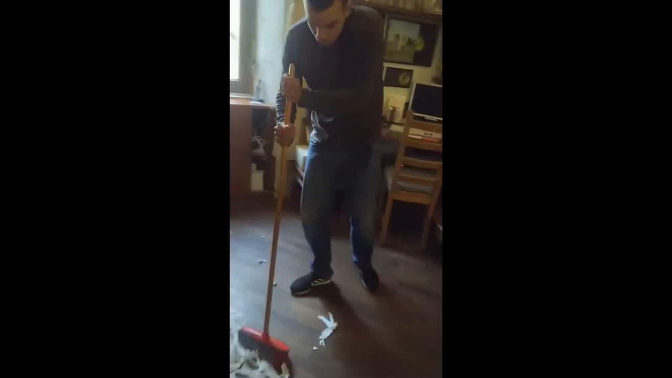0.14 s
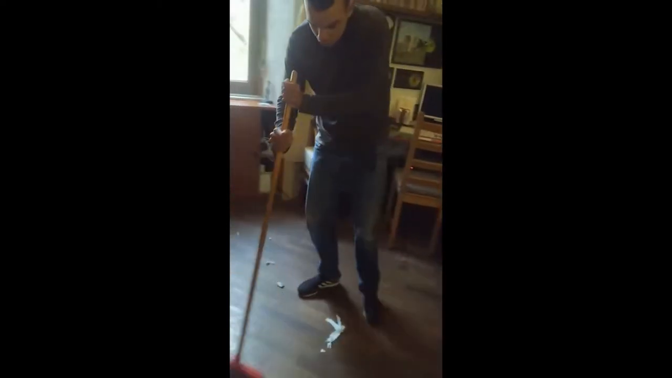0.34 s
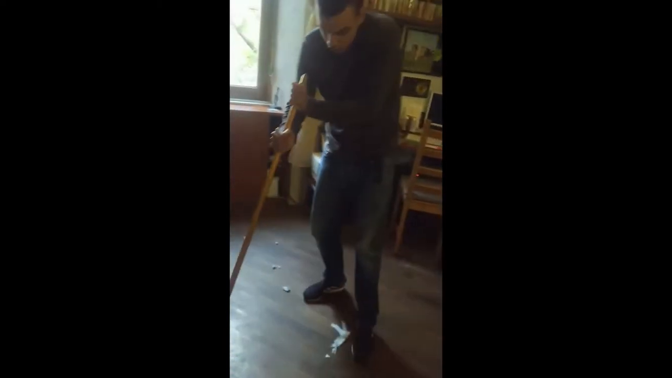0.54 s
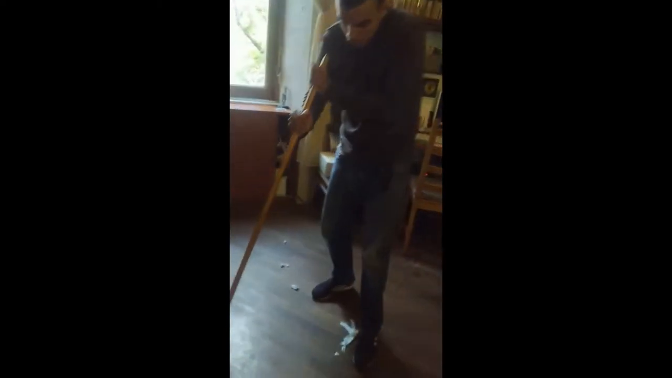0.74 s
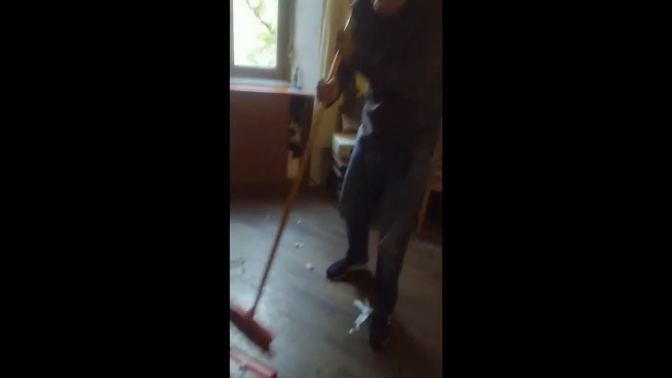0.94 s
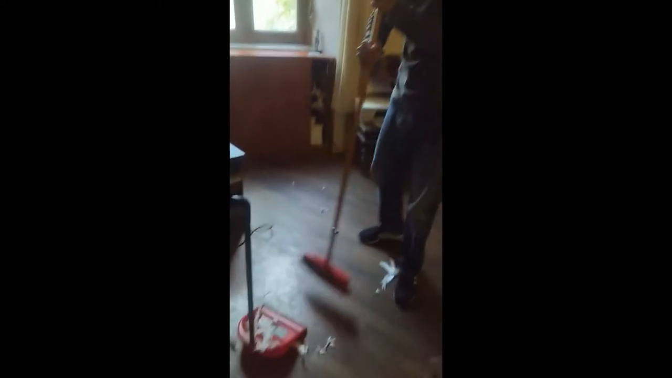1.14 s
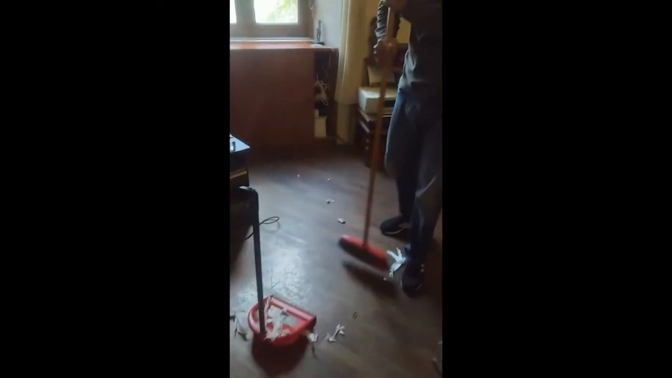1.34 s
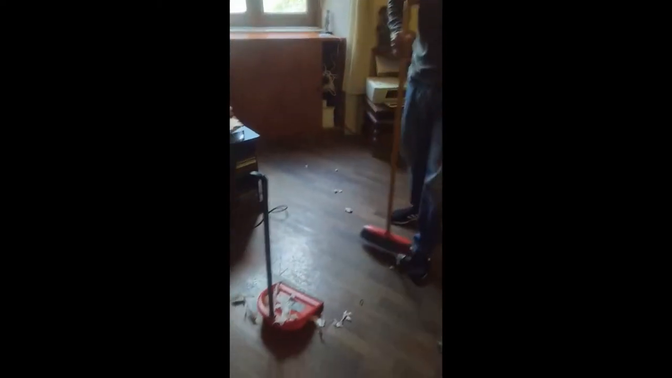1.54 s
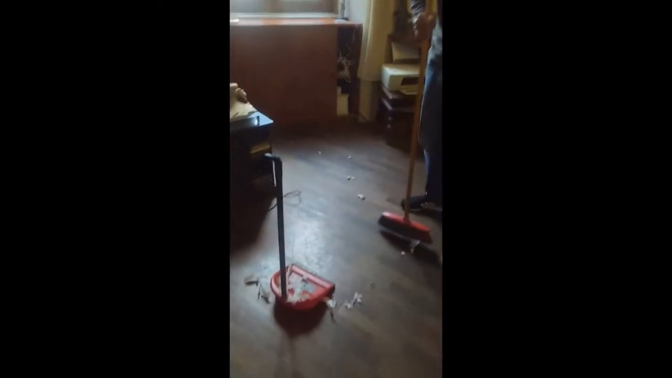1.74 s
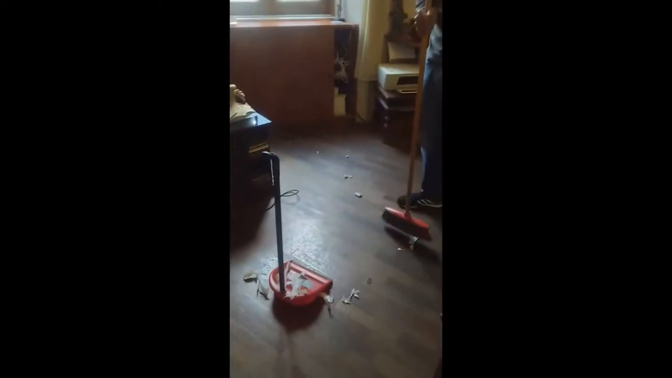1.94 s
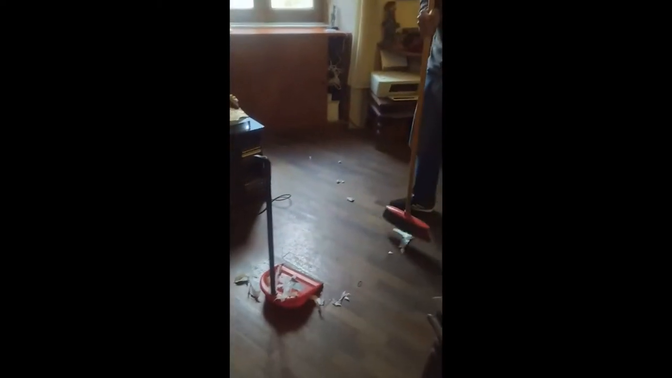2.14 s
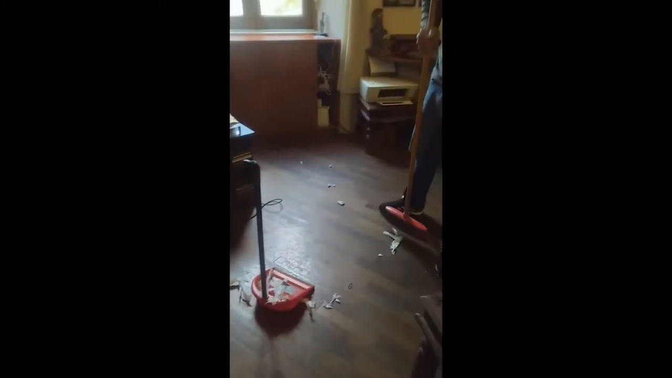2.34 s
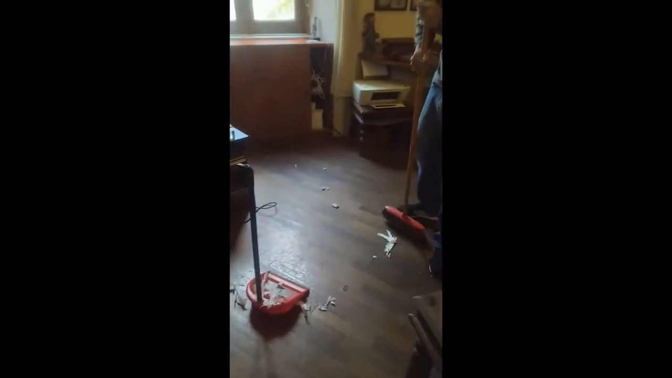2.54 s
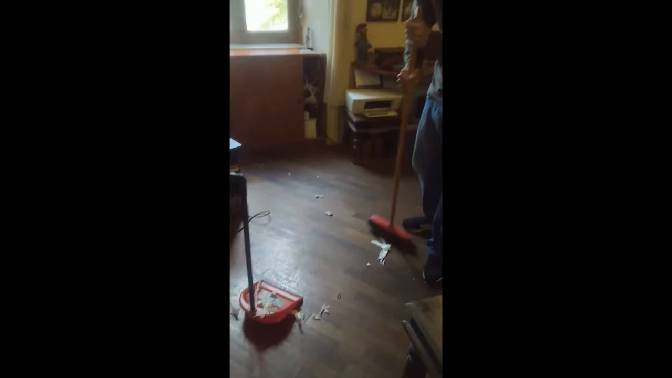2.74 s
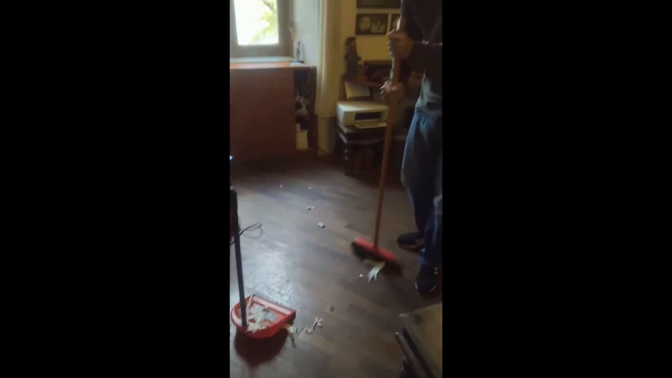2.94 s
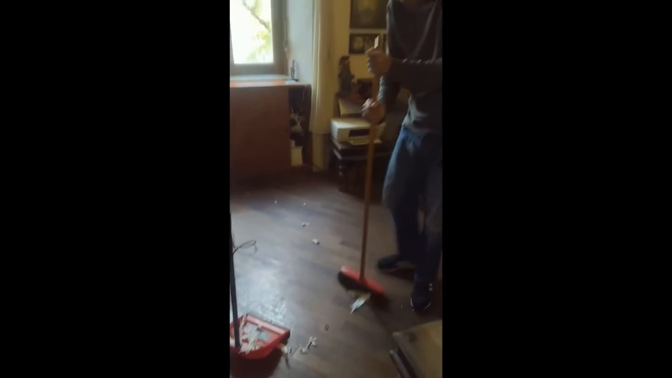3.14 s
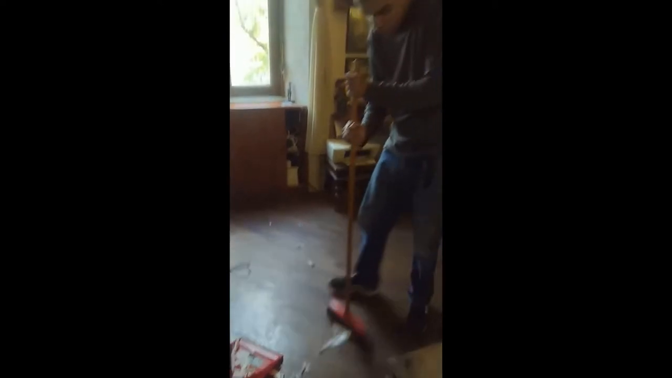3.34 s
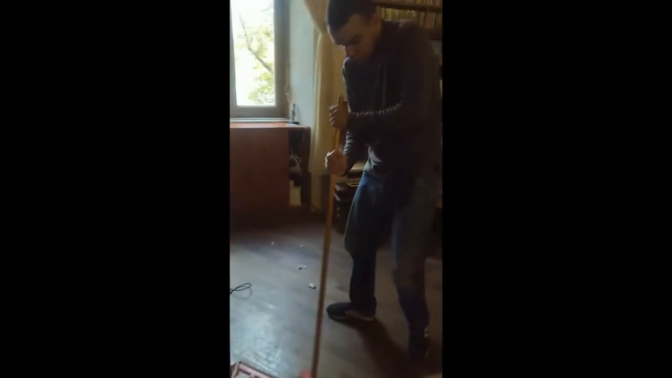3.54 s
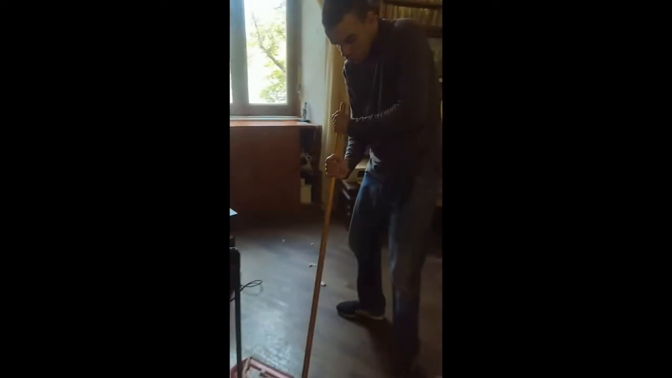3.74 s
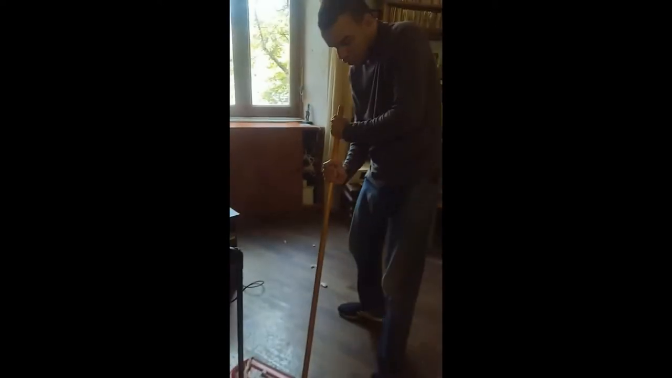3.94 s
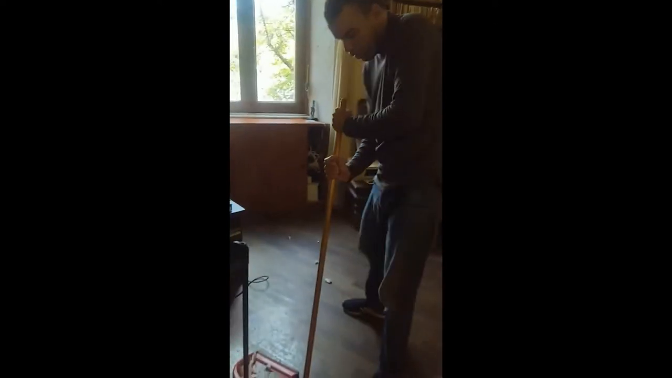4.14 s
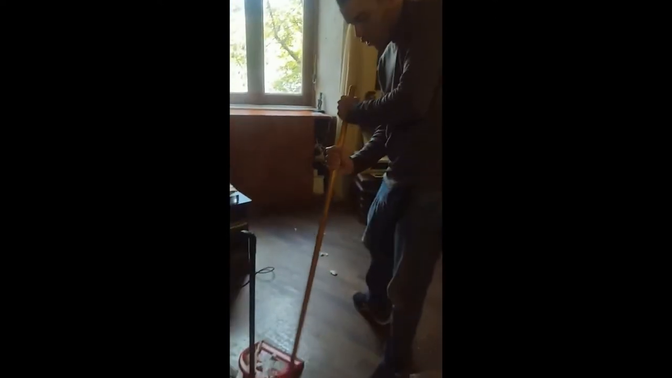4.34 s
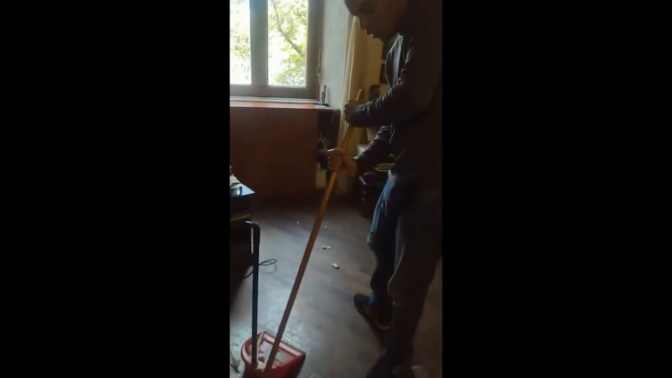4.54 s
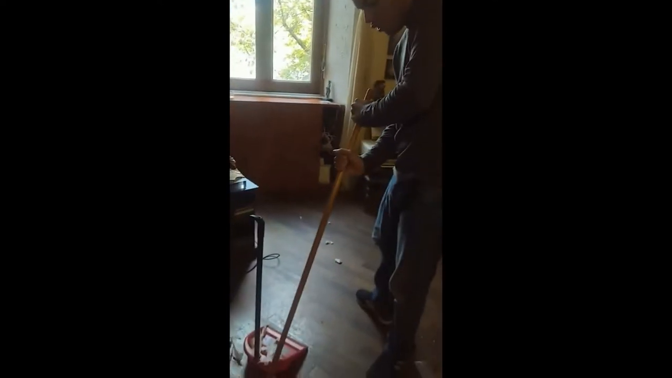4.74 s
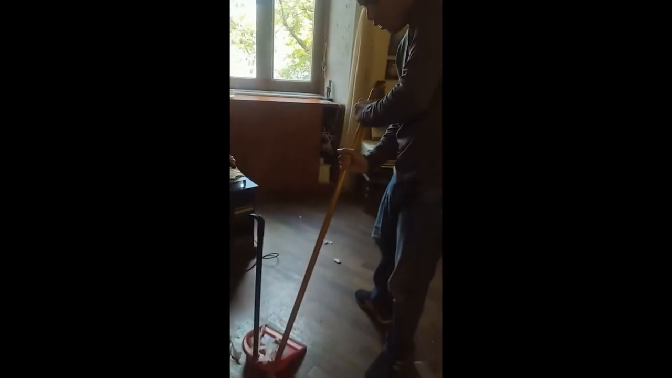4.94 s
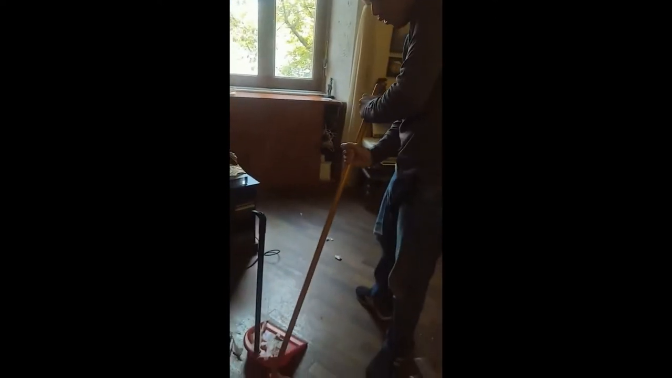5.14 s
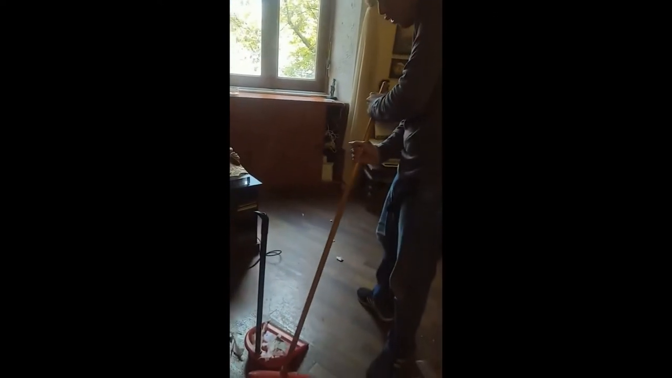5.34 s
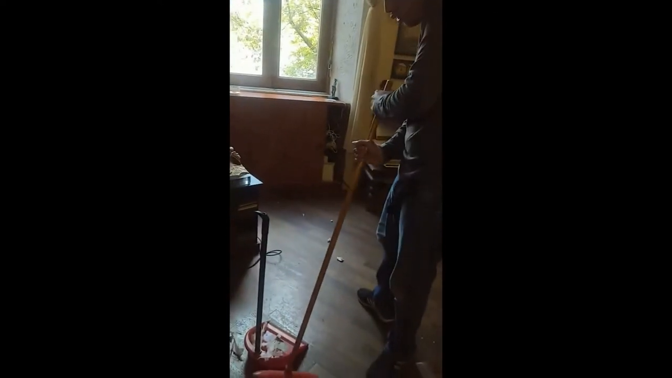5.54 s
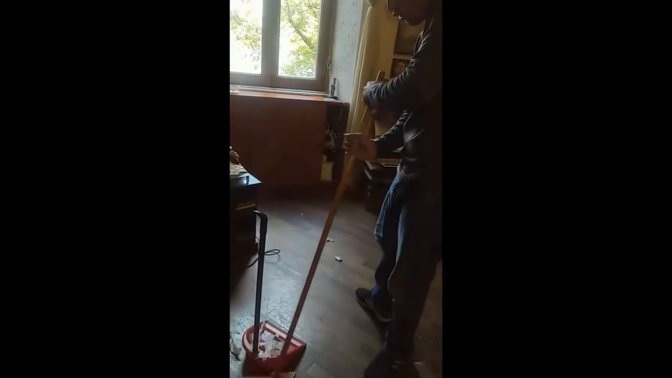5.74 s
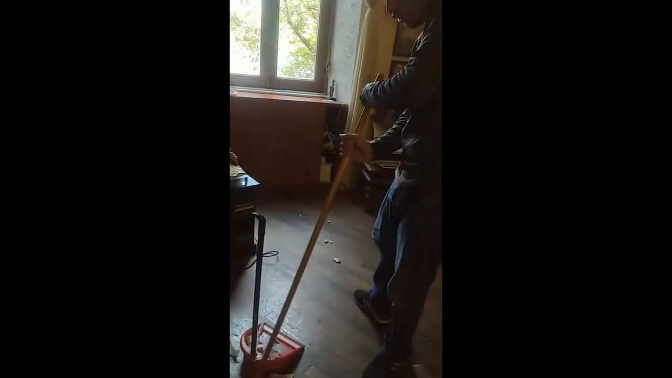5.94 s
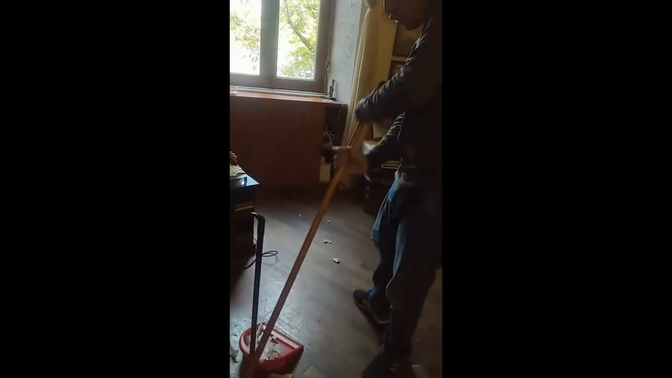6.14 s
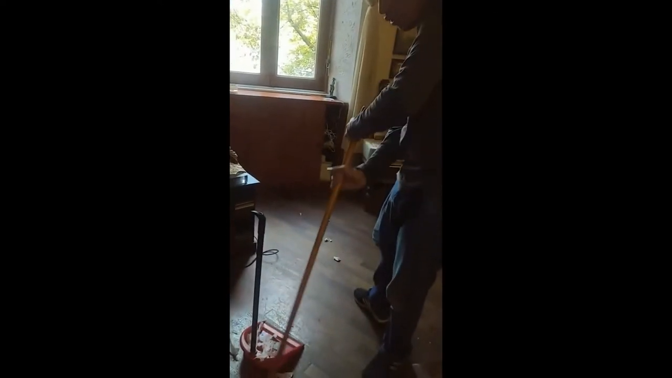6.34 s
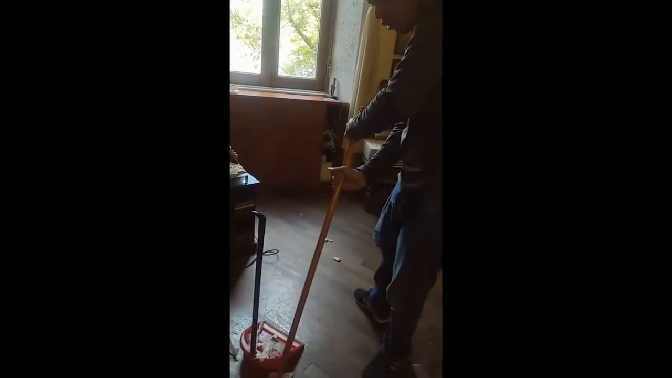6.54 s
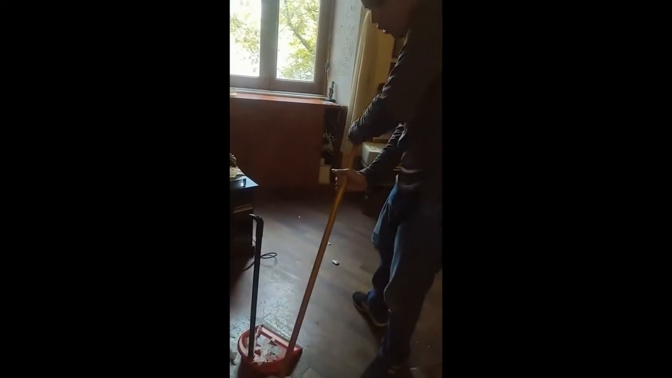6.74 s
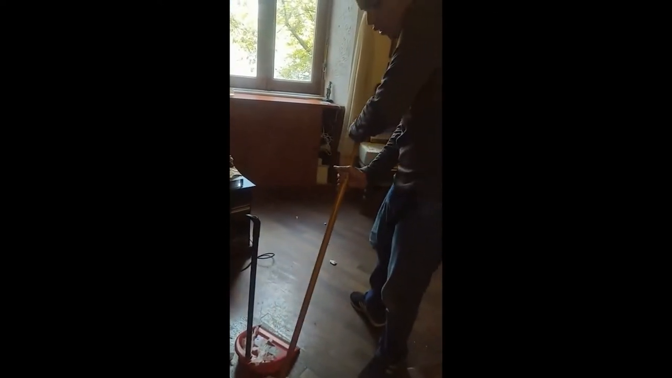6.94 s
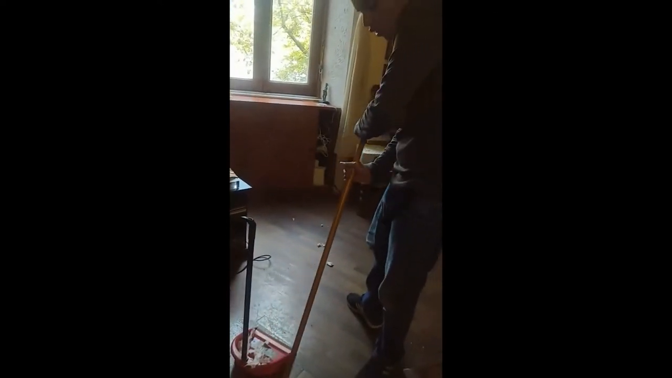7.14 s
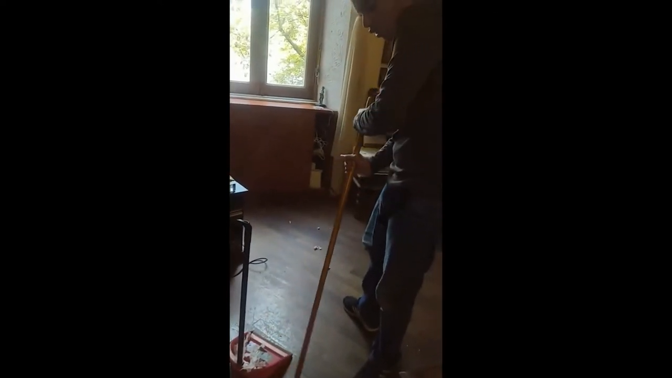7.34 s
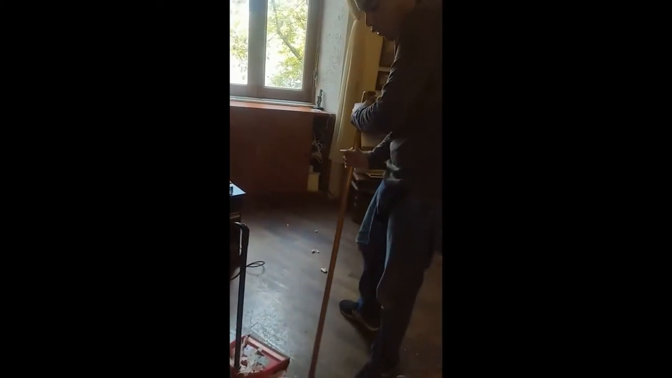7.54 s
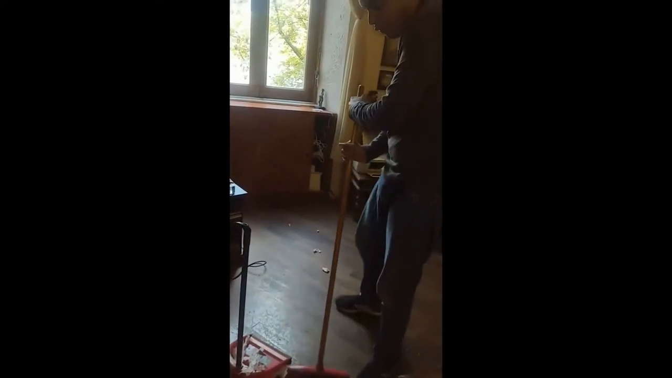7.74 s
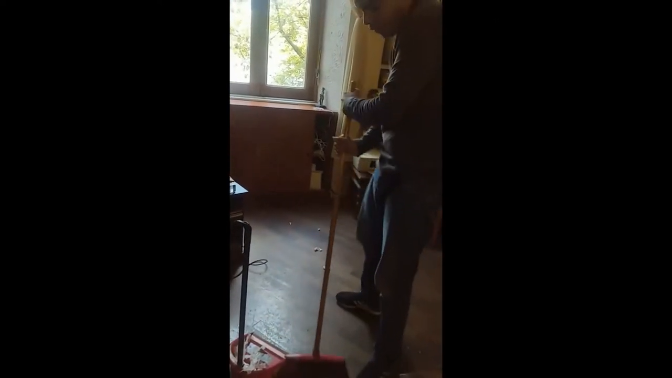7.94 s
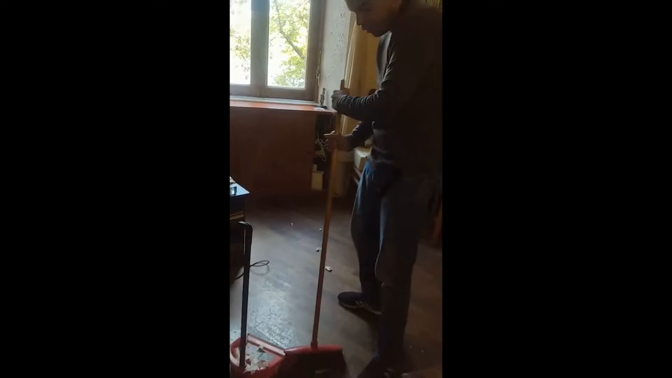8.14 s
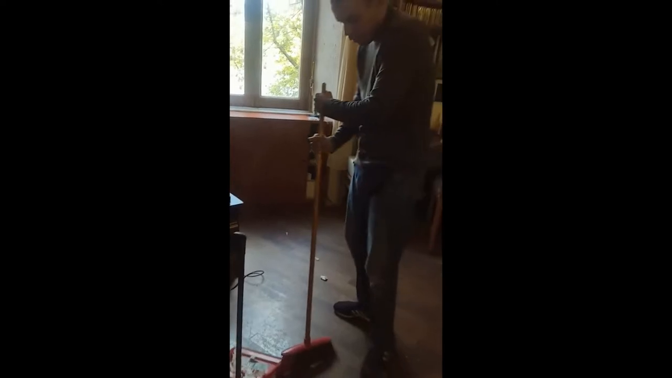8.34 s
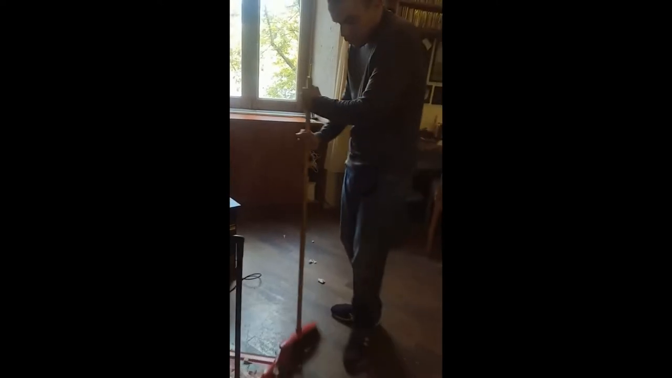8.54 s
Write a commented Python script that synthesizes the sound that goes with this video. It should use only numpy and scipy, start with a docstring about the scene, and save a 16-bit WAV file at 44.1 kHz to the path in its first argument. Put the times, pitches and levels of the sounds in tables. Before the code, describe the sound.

Crisp bristles swish and scrape on wooden boards in a small furnished room, heard from a single position. Long sweeps alternate with quick dabs, strongest a little before the middle and swelling again near the end. The broom head and shoes knock on the floor now and then, scraps rasp softly, and the broom gives one faint squeak early on. Distant traffic rumbles low beneath a gentle room hiss.

```python
"""A plastic broom sweeps scraps over a wooden floor in a small furnished room.
In long strokes and short dabs, its bristle tips flick, the shafts swish and pressed bristles scrape.
Landing bristles and pushed scraps rasp, the broom squeaks once, and its head and shoes knock on wood.
Traffic rumbles beyond the window, over soft room hiss, a low hum and a thin high whine."""
import sys
import numpy as np
from scipy import signal
from scipy.fft import rfft, irfft, next_fast_len
from scipy.io import wavfile
from scipy.ndimage import uniform_filter1d

SR = 44100
rng = np.random.default_rng(int(sys.argv[2]) if len(sys.argv) > 2 else 0)


def digitize_waveform(pressure):
    """Quantize a signal to 16-bit integers and store it at the path in sys.argv[1].

    Rows of a 2-D input are taken as channels; values are limited to [-1, 1].
    """
    field = np.atleast_2d(pressure).T
    bounded = np.clip(field, -1, 1)
    quanta = np.round(bounded * 32767).astype(np.int16)
    wavfile.write(sys.argv[1], SR, quanta)


N = 378378
TIME = np.arange(N) / SR
FREQS = np.fft.rfftfreq(N, 1 / SR)


def bristles():
    """The sweeping sound: tips, shafts and pressed bristles share one unsteady grip on the wood."""
    grip = drift(rate=20)
    flicking, swishing, scraping = tips(grip), shafts(grip), scrape(grip)
    moves = long_strokes() + dabs() + [trailing()]
    tips_gain, shafts_gain, scrape_gain = bristle_gains(moves)
    return flicking * tips_gain + swishing * shafts_gain + scraping * scrape_gain


# Tone of the flicking tips: f/Hz, relative level/dB
TIP_SPECTRUM = [(3000, -51.5), (6500, -21), (8200, -24), (9000, -9), (10000, -4), (11200, -2), (12500, -4),
                (14000, -5.5), (15700, -8.5)]
def tips(grip):
    """Thousands of tips slip free each second in a bright hiss; now and then one snags and snaps."""
    hiss = colour(room(flicks(per_s=9000, spread_db=0.5, blur_db=-12), wet_db=-11), TIP_SPECTRUM)
    hiss = tufts(hiss, patchy_db=2, patch_hz=294, patch_s=0.062) * amp(0.5 * grip + 1)
    snaps = colour(flicks(per_s=15, spread_db=2, blur_db=-40), TIP_SPECTRUM)
    return hiss + amp(-20) * snaps


# Tone of the bending shafts: f/Hz, relative level/dB
SHAFT_SPECTRUM = [(1200, -56), (2500, -15), (3800, -9.5), (5000, -4.5), (6000, -3), (7200, -2.5),
                  (8500, -1), (10500, -9), (15000, -12)]
def shafts(grip):
    """The bristle shafts swish as they bend, a little lower than the tips."""
    swish = colour(room(flicks(per_s=7000, spread_db=2.5, blur_db=-0.5), wet_db=-12.5), SHAFT_SPECTRUM)
    return tufts(swish, patchy_db=2.5, patch_hz=280, patch_s=0.073) * amp(0.94 * grip + 1.94)


# Tone of bristles pressed on the wood: f/Hz, relative level/dB
SCRAPE_SPECTRUM = [(150, -39), (400, -15.5), (700, -6.5), (1200, -0.5), (1600, -1.5), (2100, 3.5),
                   (3000, 1), (4200, 1.5), (7000, -10.5), (14000, -26)]
def scrape(grip):
    """Bristles pressed against the floor make a lower, rougher sound."""
    grit = colour(room(flicks(per_s=5000, spread_db=3, blur_db=-2), wet_db=-9.5), SCRAPE_SPECTRUM)
    return tufts(grit, patchy_db=3, patch_hz=220, patch_s=0.068) * amp(0.78 * grip + 2.13)


def flicks(per_s, spread_db, blur_db):
    """Clicks of bristles slipping free, many small and a few large, over the blur of their echoes."""
    size = amp(spread_db * np.minimum(rng.exponential(1, N), 5))
    clicks = size * rng.choice([-1, 1], N) * (rng.random(N) < per_s / SR)
    return unit(unit(clicks) + amp(blur_db) * rng.standard_normal(N))


def tufts(x, patchy_db, patch_hz, patch_s):
    """Tufts bend and ring differently as they travel, so patches of the tone come and go."""
    hz, t, slices = signal.stft(x, SR, nperseg=512, noverlap=384)
    patches = rng.standard_normal(slices.shape)
    patches = uniform_filter1d(patches, max(1, round(patch_hz / hz[1])), axis=0)
    patches = uniform_filter1d(patches, max(1, round(patch_s / t[1])), axis=1)
    slices = slices * amp(patchy_db * unit(patches))
    return unit(signal.istft(slices, SR, nperseg=512, noverlap=384)[1][:N])


# How hard the broom is pushed, one list of points per stroke: t/s, effort/dB
STROKE_EFFORTS = [
    [(0.0, -44.5), (0.122, -44), (0.224, -54.5), (0.414, -50.5), (0.498, -47), (0.602, -60), (0.728, -62.5),
     (0.8, -79)],
    [(2.73, -58), (2.882, -44.5), (2.962, -43), (3.072, -39), (3.158, -42.5), (3.382, -36.5),
     (3.494, -40.5), (3.554, -38.5), (3.608, -45), (3.746, -66.5), (3.8, -65)],
    [(4.6, -66), (4.652, -60), (4.958, -64), (5.23, -55.5), (5.454, -56.5), (5.534, -68.5), (5.56, -69)],
    [(6.65, -73), (6.72, -56.5), (6.816, -51), (6.932, -57), (7.0, -55.5)],
    [(7.0, -55.5), (7.102, -51), (7.418, -44.5), (7.58, -47), (7.616, -41), (7.654, -45.5), (7.964, -51),
     (8.08, -55.5)],
    [(8.08, -55), (8.156, -51.5), (8.58, -49.5)],
]
# How the broom leans in each stroke: extra shaft bend/dB, extra floor pressure/dB
STROKE_LEANS = [(-2, 1.5), (0, -2), (1, -1.5), (2, -2), (0.5, -1.5), (0, 2.5)]
def long_strokes():
    """Each long stroke is one move of the broom: (effort over time, bend, pressure), all in dB."""
    return [(np.interp(TIME, *np.transpose(path), left=-200, right=-200), bend, pressure)
            for path, (bend, pressure) in zip(STROKE_EFFORTS, STROKE_LEANS)]


# Short dabs: full contact t/s, rise/s, hold/s, effort/dB, extra bend/dB, extra pressure/dB
DAB_MOVES = [ (0.85, 0.08, 0.06, -64.5, -7, -1), (1.348, 0.062, 0.023, -55.5, -3, 0),
             (1.45, 0.03, 0.004, -63, -8, 3), (1.593, 0.015, 0.018, -48, -3, -4),
             (1.626, 0.057, 0.026, -46.5, -2.5, 0.5), (1.84, 0.03, 0.0066, -63, -4, 2.5),
             (2.413, 0.04, 0.011, -64.5, 5, 4.5), (2.505, 0.04, 0.18, -53.5, -1, -3.5),
             (2.63, 0.017, 0.011, -47, -3, 6.5), (3.907, 0.023, 0.027, -60, 4.5, 9.5),
             (4.411, 0.059, 0.0035, -43.5, 3.5, 5.5), (4.645, 0.046, 0.035, -65, 1, 10),
             (5.638, 0.084, 0.022, -56.5, 2, 0), (6.37, 0.023, 0.067, -45, 1.5, 5), ]
def dabs(rise_db=19, lift_db_per_s=149):
    """Each dab is a quick move that swells, holds, and fades as the broom lifts off."""
    moves = []
    for s, rise, hold, effort, bend, pressure in DAB_MOVES:
        landing = rise_db * np.maximum(s - TIME, 0) / rise
        leaving = lift_db_per_s * np.maximum(TIME - s - hold, 0)
        moves.append((effort - landing - leaving, bend, pressure))
    return moves


# When the broom is almost clear of the floor: from t/s, to t/s
LIFT_TIMES = [(1.15, 1.33), (5.8, 6.08)]
def trailing(rest_db=-68, sway_db=2.5, lift_db=-6, ease_s=0.14):
    """The move between strokes: the bristles trail lightly, and more lightly still while lifted."""
    lifted = np.any([(TIME > start) & (TIME < end) for start, end in LIFT_TIMES], axis=0)
    eased = uniform_filter1d(lifted * 1.0, round(ease_s * SR))
    return rest_db + sway_db * drift(rate=3.7) + lift_db * eased, 0, 0


def bristle_gains(moves, usual_effort_db=-48):
    """More effort makes tips, shafts and scrape louder, each at its own rate; the strongest move leads."""
    levels = []
    for effort, bend, pressure in moves:
        push = effort - usual_effort_db
        tips_db = -47.5 + push
        shafts_db = -56 + 0.94 * push + bend
        scrape_db = -66.5 + 0.76 * push + pressure
        levels.append((tips_db, shafts_db, scrape_db))
    return uniform_filter1d(amp(np.max(levels, axis=0)), size=200)


# Low rasps of scraps pushed over the floor, and one soft thump as the broom lands (second row):
# t/s, level/dB, centre f/Hz, rise/s, decay/s
SCRAP_PUSHES = [(0, -68.5, 345, 0.0091, 0.65), (6.369, -60.5, 377, 0.011, 0.035),
                (7.97, -64, 898, 0.013, 0.098), (8.27, -67, 1018, 0.041, .12),
                (8.475, -63.5, 970, 0.0071, 0.039)]
def rasps():
    """Bristles rasp as they land in a dab, pushed scraps rasp lower, and once the broom thumps softly."""
    t = np.arange(SR) / SR
    grains = flicks(per_s=3000, spread_db=3.5, blur_db=-3.5)
    *_, scrape_gain = bristle_gains(dabs())
    out = unit(band(grains, centre_hz=1170, octaves=0.47)) * amp(-5.5) * scrape_gain  # the dabs
    for s, db, hz, rise, decay in SCRAP_PUSHES:
        stretch = np.roll(grains, -round(s * SR))[:len(t)]
        envelope = np.minimum(t / rise, 1) * np.exp(-np.maximum(t - rise, 0) / decay)
        add(out, s, amp(db) * unit(band(stretch, hz, octaves=0.56)) * envelope)
    return out


# Knocks, with levels relative to each other: t/s, thud/dB, clack/dB, tick/dB, clack f/Hz, clack decay/s
FLOOR_KNOCKS = [ (0.691, -56, -55, -44, 800, 0.007), (0.795, -45, -43, -51, 594, 0.01),
                (1.586, -43, -35.5, -50, 535, 0.0048), (2, -46.5, -50, -45, 1400, 0.011),
                (2.152, -59, -42, -68, 444, 0.0043), (3.394, -31.5, -27, -45, 675, 0.0076),
                (4.007, -42, -29.5, -42.5, 443, 0.0069), (4.627, -47.5, -47, -53, 1183, 0.021),
                (5.722, -50, -55, -65.5, 349.7, 0.015), (7.783, -41, -51.5, -44, 650, 0.023), ]
def knocks(level_db=-14, bounce_s=0.012, boom_delay_s=0.05):
    """The broom head or a shoe hits the floor: a hard tick, a clack, and a thud as the boards give."""
    out = np.zeros(N)
    for s, thud_db, clack_db, tick_db, clack_hz, decay_s in FLOOR_KNOCKS:
        add(out, s, amp(tick_db) * blow(hz=1500, octaves=1, decay_s=0.017, ring_db=-5))
        add(out, s, amp(thud_db) * blow(hz=232, octaves=0.42, decay_s=0.019))
        for delay, softer_db in [(0, 0), (bounce_s, -5)]:  # the clack bounces once
            clack = blow(clack_hz, octaves=0.52, decay_s=decay_s)
            add(out, s + delay, amp(clack_db + softer_db) * clack)
        boom = blow(hz=50, octaves=0.11, decay_s=0.041)  # the whole floor answers the thud
        add(out, s + boom_delay_s, amp(thud_db - 4) * boom)
    return amp(level_db) * room(out, wet_db=-5)


# Notes the boards and broom head ring with: f/Hz, relative level/dB, time to fade by 60 dB/s
BOARD_NOTES = [(208, -4, 0.146), (273, -11.5, 0.033), (338, -10, 0.077), (390.5, 3.5, 0.1),
               (421, 6.5, 0.059), (560, 8.5, 0.046), (625, -13, 0.12), (660, -1, 0.16), (817, -5, 0.081),
               (920, -13.5, .1), (1025, -9, 0.091), (1160, -10, 0.12), (1380, -6, .1), (1830, -14, 0.11)]
def blow(hz, octaves, decay_s, ring_db=-3, contact_s=0.0014):
    """One hit: a short clatter plus the ring of the boards, both around hz (lower for a softer hit)."""
    t = np.arange(SR // 2) / SR
    ring = sum(amp(db - 60 * t / fade_s) * np.sin(2 * np.pi * (f * t + rng.random()))
               for f, db, fade_s in BOARD_NOTES)
    clatter = unit(band(rng.standard_normal(len(t)), hz, octaves)) * np.exp(-t / decay_s)
    ring = band(np.pad(ring, (0, len(t))), hz, octaves)[:len(t)]
    ring = unit(ring) * np.std(clatter) * amp(ring_db)
    return (clatter + ring) * np.minimum(t / contact_s, 1)


def squeak(pitch_hz=3780, waver_hz=45, level_db=-72):
    """Rubbing makes a thin, fuzzy tone that swells and fades as the broom is drawn back."""
    phase = 2 * np.pi * np.cumsum(pitch_hz + waver_hz * drift(rate=5.9)) / SR
    core, rub = (drift(rate) + 1j * drift(rate) for rate in (110, 300))  # a narrow band in a wider one
    tone = unit(((core + 0.94 * rub) * np.exp(1j * phase)).real)
    return tone * amp(level_db) * arch(s=1.87, length=0.62)


# A distant engine: t/s, firing rate f/Hz, level/dB
ENGINE_PATH = [(0, 52.1, -65.5), (.75, 52.7, -66), (1.1, 60.2, -75), (3.7, 49.9, -77), (4.7, 46.24, -60),
               (6.199, 51, -65), (6.65, 62.1, -66.5), (7.0, 74, -63.5), (7.3, 79.65, -61), (7.6, 72.7, -70),
               (8, 62, -64.5), (8.58, 54.9, -72)]
# Its tones: multiple of the firing rate, relative level/dB
ENGINE_TONES = [(1, 9), (2, -1.5), (3, -16.5), (4, -11), (5, -15), (6, -10.5)]
def traffic():
    """Only an engine's lowest tones get through the window, each fading in and out."""
    s, hz, db = np.transpose(ENGINE_PATH)
    firing_hz = np.interp(TIME, s, hz) * (1 + 0.0273 * drift(rate=8.6))
    phase = 2 * np.pi * np.cumsum(firing_hz) / SR
    rumble = sum(amp(tone_db + 3.3 * drift(rate=7.9)) * np.sin(k * phase) for k, tone_db in ENGINE_TONES)
    return unit(rumble) * amp(np.interp(TIME, s, db))


# Tone of the quiet room: f/Hz, relative level/dB
AIR_SPECTRUM = [(15, -30), (25, -9.5), (53, -4.5), (107, -8.5), (204, -13), (247, -18), (282, -17.5),
                (369, -20.5), (411, -21), (785, -24.5), (1060, -26.5), (2070, -27), (4520, -34.5),
                (11600, -33), (15600, -28.5)]
def still_air(level_db=-63):
    """The room's own low wash and hiss, swaying gently in level."""
    return colour(rng.standard_normal(N), AIR_SPECTRUM) * amp(level_db + drift(rate=2.1))


def hum(pitch_hz=118.1, level_db=-74, fade_from_s=3.54, fade_db_per_s=29):
    """A low wavering hum from outside holds for a while, then dies away."""
    tone = np.sqrt(2) * np.sin(2 * np.pi * pitch_hz * TIME + 3.2 * drift(rate=2.1))
    return tone * amp(level_db - fade_db_per_s * np.maximum(TIME - fade_from_s, 0))


# Moments when the whine grows louder: start t/s, length/s, level/dB
WHINE_RISES = [(0.606, 0.8, -77), (2.054, 0.74, -76), (5.451, 0.97, -81)]
def whine(pitch_hz=11240, base_db=-85):
    """A thin, high, wavering whine that comes and goes."""
    tone = np.sqrt(2) * np.sin(2 * np.pi * pitch_hz * TIME + 1.7 * drift(rate=17))
    swells = sum(amp(db) * arch(s, length) for s, length, db in WHINE_RISES)
    return tone * amp(2.5 * drift(rate=5.7)) * (amp(base_db) + swells)


# How long the room echoes: f/Hz, time to fade by 60 dB/s
ECHO_TIMES = [(150, 0.49), (500, 0.26), (2000, 0.44), (8000, 0.097), (15000, 0.14)]
def room(x, wet_db):
    """Adds scattered room echoes at wet_db against the direct sound; each pitch fades at its own speed."""
    length = SR // 2
    echoes = rng.standard_normal(length) * (rng.random(length) < 0.1)
    echoes *= np.arange(length) > 150  # a short gap before the first echo
    hz, t, slices = signal.stft(echoes, SR, nperseg=256)
    fade = amp(-60 * t / read(ECHO_TIMES, hz)[:, None])
    tail = signal.istft(slices * fade, SR, nperseg=256)[1]
    reverb = signal.fftconvolve(x, tail / np.linalg.norm(tail))[:N]
    wet = amp(wet_db)
    return (x + wet * reverb) / np.sqrt(1 + wet ** 2)


def amp(db):
    """Turns decibels into a gain to multiply by."""
    return 10 ** (np.asarray(db) / 20)


def unit(x):
    """Scales x to an average (rms) level of 1."""
    return x / np.sqrt(np.mean(x ** 2) + 1e-20)


def read(points, hz):
    """Looks up a table between its rows, with frequency spaced in octaves."""
    f, value = np.transpose(points)
    return np.interp(np.log(hz + 1), np.log(f + 1), value)


def colour(x, spectrum):
    """Shapes the tone of x with a spectrum table, at level 1."""
    return unit(irfft(rfft(x) * amp(read(spectrum, FREQS)), N))


def band(x, centre_hz, octaves):
    """Keeps a bell-shaped band of frequencies around a centre."""
    hz = np.fft.rfftfreq(len(x), 1 / SR) + 1
    return irfft(rfft(x) * np.exp(-0.5 * (np.log2(hz / centre_hz) / octaves) ** 2), len(x))


def drift(rate):
    """A smooth random wobble of level 1, up to about `rate` times a second."""
    spectrum = rfft(rng.standard_normal(2 * next_fast_len(N // 2 + 1)))
    hz = np.linspace(0, SR / 2, len(spectrum))
    return unit(irfft(spectrum * np.exp(-0.5 * (hz / rate) ** 2))[:N])


def arch(s, length):
    """One smooth swell from zero to one and back, starting at s seconds."""
    return np.sin(np.pi * np.clip((TIME - s) / length, 0, 1))


def add(mix, s, sound):
    """Mixes a sound in at s seconds."""
    part = mix[max(round(s * SR), 0):][:len(sound)]
    part += sound[:len(part)]


def scene():
    """Everything is heard from one spot, alike in both ears."""
    mono = bristles() + rasps() + knocks() + squeak() + traffic() + still_air() + hum() + whine()
    return np.array([mono, mono])


def record(dry, low_hz=36, high_hz=15780):
    """The microphone drops the deepest bass and the highest treble."""
    thin = signal.sosfilt(signal.butter(4, low_hz, "highpass", fs=SR, output="sos"), dry)
    treble_cut = signal.firwin(801, high_hz, window=("kaiser", 9), fs=SR)
    return signal.oaconvolve(thin, treble_cut[None], "same")


dry = scene()
out = record(dry)
digitize_waveform(out)
```